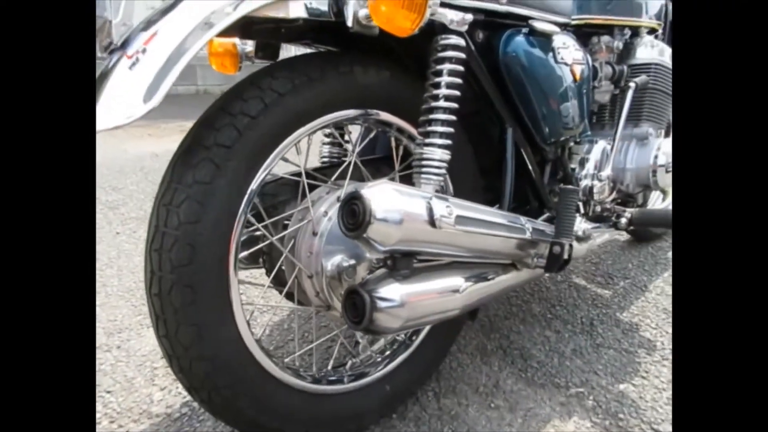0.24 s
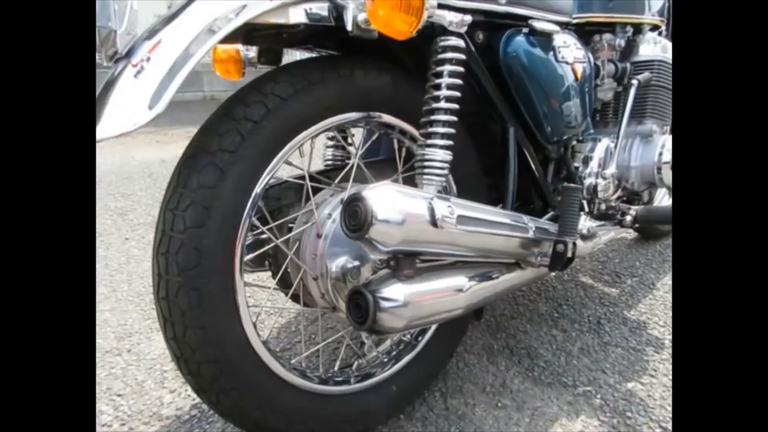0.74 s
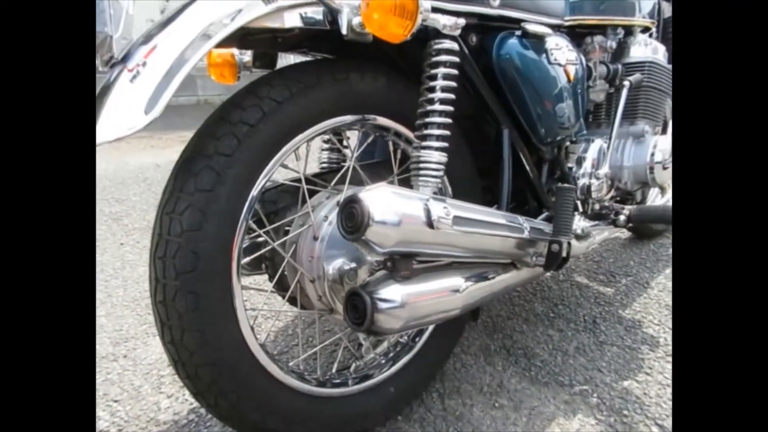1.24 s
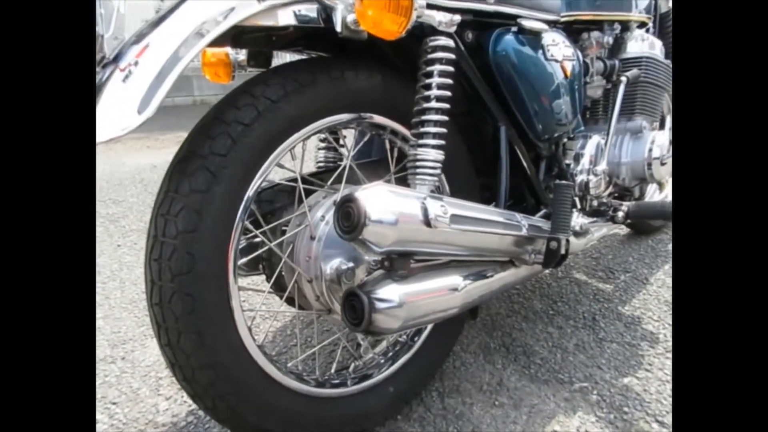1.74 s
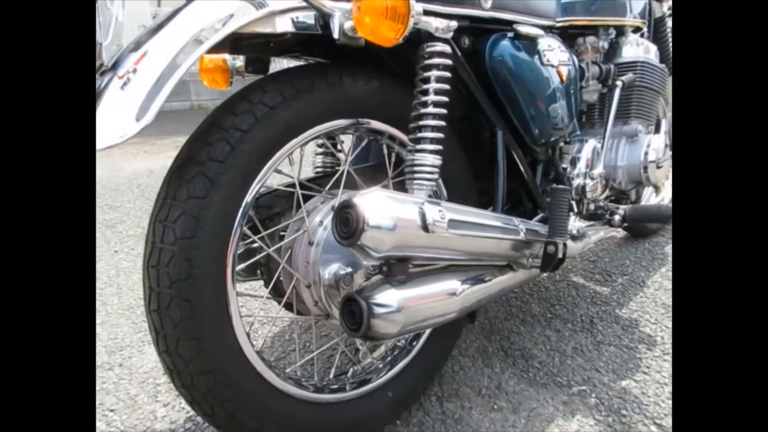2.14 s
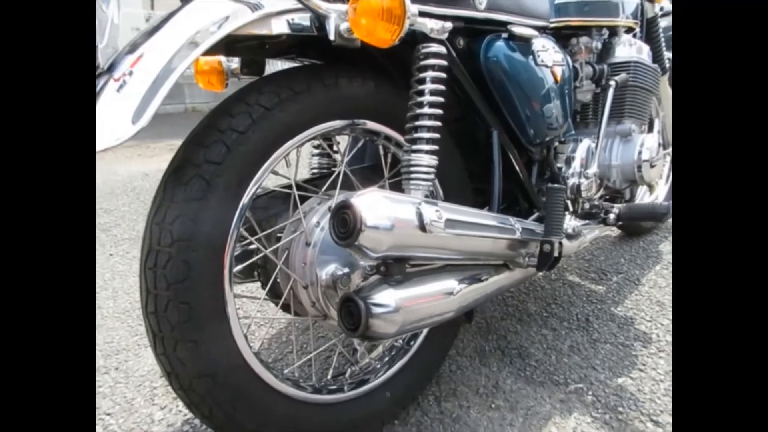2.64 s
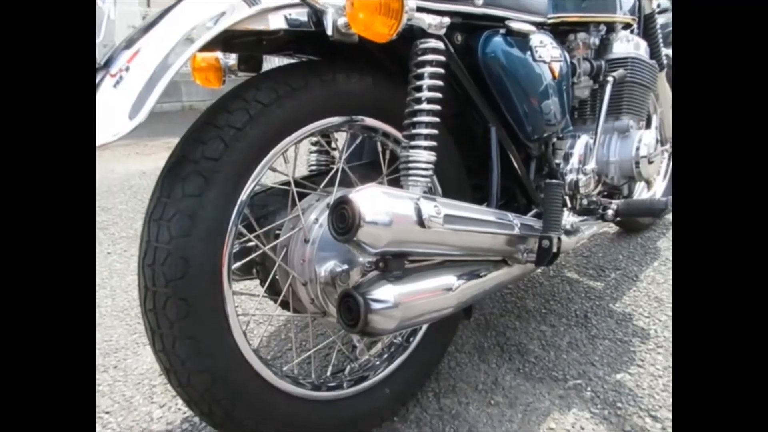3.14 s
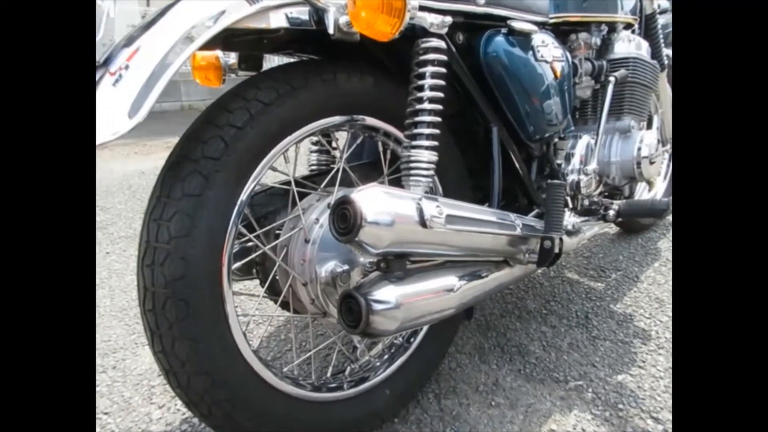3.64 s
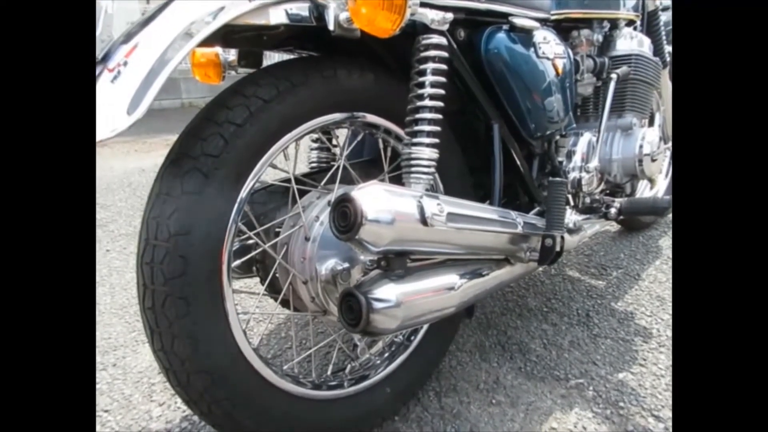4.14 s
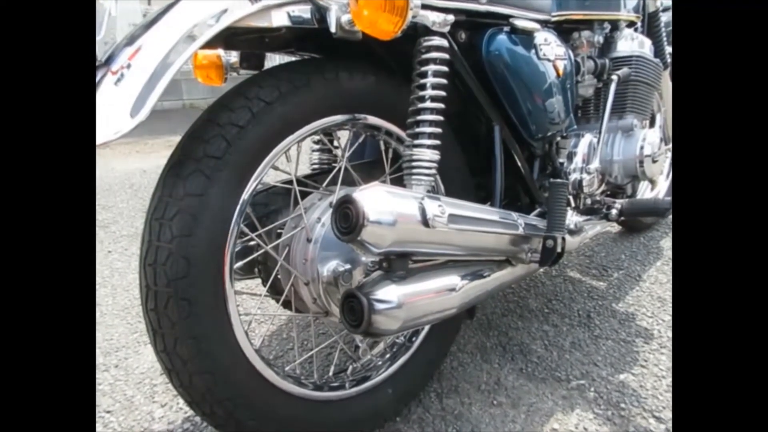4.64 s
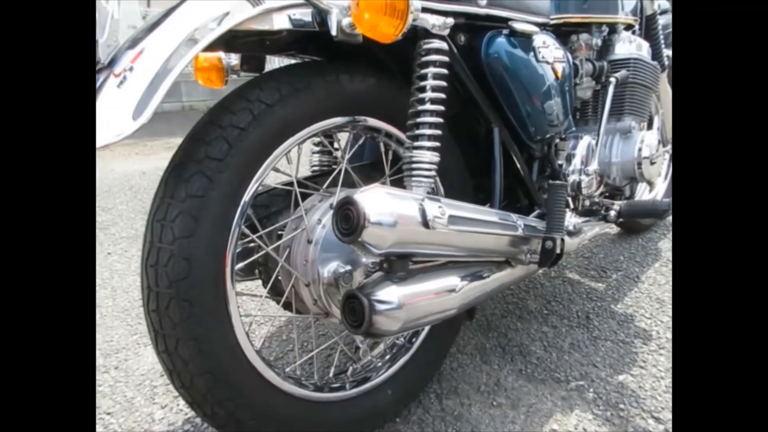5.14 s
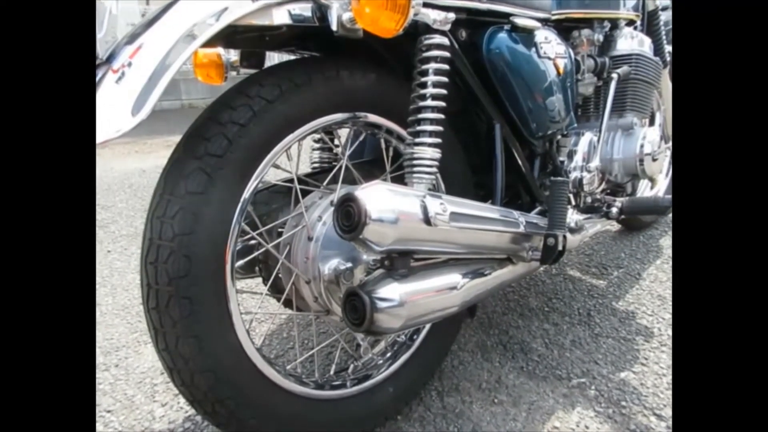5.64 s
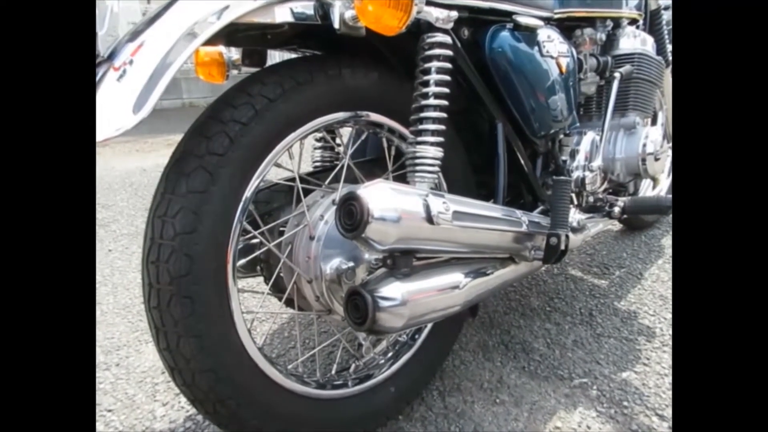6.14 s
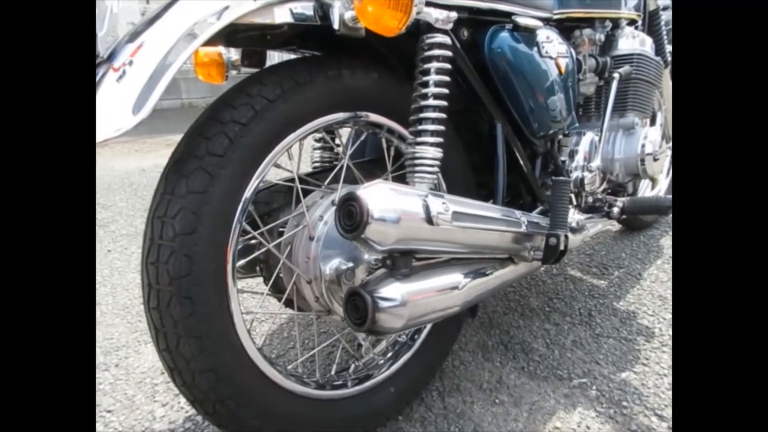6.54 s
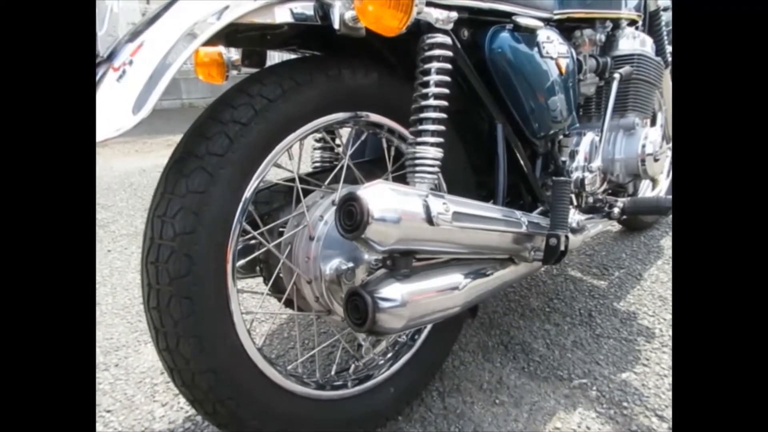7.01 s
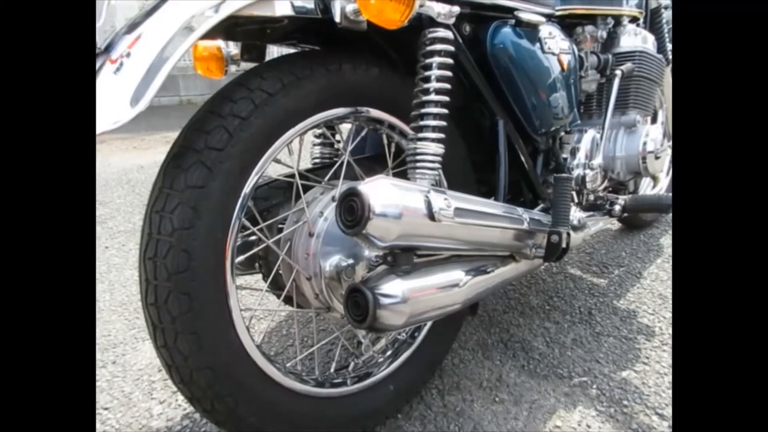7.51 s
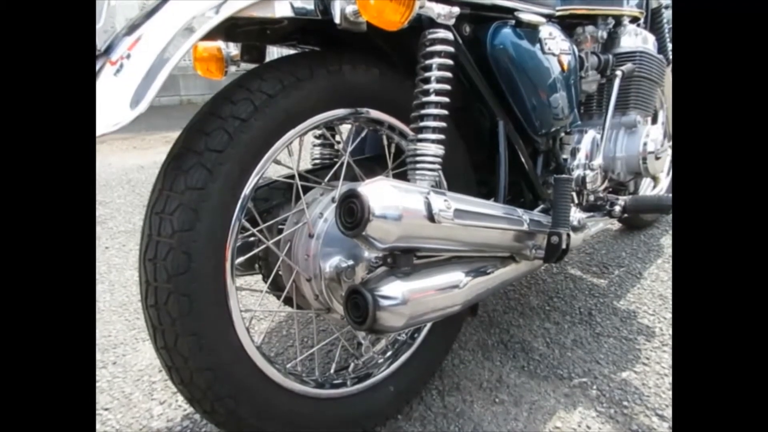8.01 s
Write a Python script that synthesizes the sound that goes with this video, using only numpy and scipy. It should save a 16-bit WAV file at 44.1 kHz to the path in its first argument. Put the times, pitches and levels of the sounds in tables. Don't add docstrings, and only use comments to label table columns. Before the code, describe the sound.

A four-cylinder motorcycle stands in a paved outdoor yard, heard close behind its pipes. It chuffs at a slow lumpy idle, each cycle with a tiny airy whistle. The throttle is blipped five times, a rough raspy roar rising quickly, then snapping shut into a smooth falling hum and uneven thumps. The first blip ends in a weak pop, the second in a loud crack. A sixth rise begins at the end.

```python
import sys
import numpy as np
from scipy import signal
from scipy.io import wavfile
from scipy.ndimage import uniform_filter1d

SR = 44100
rng = np.random.default_rng(int(sys.argv[2]) if len(sys.argv) > 2 else 0)


def file_out(sig):
    cols = np.atleast_2d(sig).T
    lim = np.clip(cols, -1, 1)
    pcm = np.round(lim * 32767).astype(np.int16)
    wavfile.write(sys.argv[1], SR, pcm)


def natural_amplitude(level_db):
    exponent = np.asarray(level_db, float) / 20
    return 10 ** exponent


N = 364707
TIME = np.arange(N) / SR

# opens t/s, shuts t/s, torque/(cycles/s^2), hiss level/dB, growl level/dB
BLIPS = [(0.696, 1.074, 213, -3.5, -22.5), (2.187, 2.626, 175, -3.5, -25.5), (3.742, 4.172, 206, 0, -33.5),
         (5.266, 5.682, 222, 1, -33), (6.768, 7.196, 215, 0.5, -35), (8.33, 8.7, 215, 0, -33)]
OPEN_S, EASE_S, EASE_SHARE, SHUT_S = 0.2, 0.12, 0.12, 0.036
SLACK_S, SLACK_SHARE = 0.3, 0.063

START_RATE, IDLE_RATE, TOP_RATE, DRAG, DRAG_KNEE = 17, 6.6, 70, 44, 7.0
SLOW_CYCLE_S = 0.054

# t/s, near whistle level/dB, second cylinder level/dB, last two level/dB
IDLE_CYCLES = [(0.0957, -24, -11.5, -16), (0.1798, -23, -24, -21), (0.2834, -20.5, -18, -25),
               (.411, -19, -26, -11.5), (0.5539, -16, -31, -18), (0.7142, -17.5, -22, -4),
               (1.7169, -22, -46, -41), (1.8254, -21, -30, -12.5), (1.9464, -22, -24, -26),
               (2.0899, -15.5, -40, -10.5), (2.235, -12, -32, -2.5), (3.2901, -22.5, -11.5, -31),
               (3.385, -19.5, -40, -21), (3.4987, -17.5, -15, -14), (3.6342, -20.5, -17, -8),
               (3.7684, -13.5, -10, -5.5), (4.8618, -19, -10.5, -24), (4.952, -18, -50, -21),
               (5.0598, -15, -33, -17), (5.186, -19.5, -12, -9), (5.3221, -12.5, -11, 1.5),
               (6.3304, -25, -14, -18), (6.414, -24.5, -17, -20.5), (6.5137, -20, -40, -23),
               (6.633, -22, -14, -20), (6.7667, -17.5, -40, -6), (7.8594, -25, -8.5, -28),
               (7.95, -19, -47, -37), (8.0604, -22.5, -19.5, -12), (8.183, -21, -14, -17)]
LULL_FIRST_CYCLES = [1, 27, 55, 86, 116, 146]
# t/s, cycle count, near whistle level/dB
ODD_PUFFS = [(0.0165, 0, -37.5), (0.8146, 7, -10), (0.9948, 11, -21), (1.0866, 14, -15.5),
             (1.3334, 21, -21.5), (1.549, 25, -21), (1.63, 26, -49), (2.332, 32, -9), (2.48, 35, -18.5),
             (2.6439, 40, -10.5), (2.86, 47, -22), (3.025, 51, -23), (3.139, 53, -36), (3.8646, 60, -7.5),
             (4.069, 65, -14), (4.1712, 69, -14), (4.4013, 77, -20), (4.715, 84, -22), (4.783, 85, -44),
             (5.413, 91, -11.5), (5.5436, 94, -16.5), (5.682, 99, -20), (6.0132, 110, -21.5),
             (6.0989, 112, -18.5), (6.2589, 115, -22), (6.88, 121, -10.5), (7.0318, 124, -14),
             (7.1991, 130, -28), (7.4769, 139, -18.5), (7.6556, 143, -22)]

# f/Hz, width/Hz, level/dB
SILENCER_MODES = [
    (106.1, 11.3, 4.5),
    (69.6, 23, 1),
    (171, 100, -5),
]
# f/Hz, width/Hz, level/dB
PIPE_MODES = [(240.5, 37, -2), (340, 143, -3), (501, 178, 4.5), (688, 240, 0.5), (873, 466, 6.5),
              (1160, 410, -3)]
# f/Hz, width/Hz, level/dB
HEADER_MODES = [(329.3, 28, 0), (241.6, 20, -7), (503, 49, -3)]
CYLINDER_DB = [7.5, 11, -3.5, 5]
# level/dB, then lift at open throttle/dB
SLOWING_DB = [-12.5, -18, -22, -14.5]
CATCH_DB = [14.5, -15, 12, 13]
SLOWING_SCATTER_DB = 3.0
THUMP_DB, THUMP_FOLLOWS, THIRD_DB = -10, 0.25, -2.5

# rate/(cycles/s), level/dB
BOOM_BY_RATE = [(8, -27.5), (17, -26), (22, -13), (24.5, -10), (28, -9.5), (32, -15.5), (38, -18.5)]
BOOM_OPEN_DB, BOOM_OPEN_RATE = 27, 22.8
LOAD_CUT_HZ, LOAD_LIFT_DB = 92, 2.5
# multiple of cycle rate, overrun level/dB, load level/dB
ORDERS = [(2, -42, 2.5), (3, -2.5, -2), (4, 9, 4), (5, -4, -2), (6, -18.5, -22), (7, -14, -24),
          (8, -17, -12), (12, -23.5, -9.5)]

# shut level at rest/dB, slope/(dB per cycle/s), open level/dB, its slope/(dB per cycle/s),
# share of a twist's hiss, lag power
FLOW = [
    (-45, 0.3955, -20, 0.27, 0.24, 0.61),
    (-50.5, 0.496, -27.5, 0.04, 0.38, 0.53),
    (-56, 0.3219, -32.5, 0, 2, 0.53),
]
# f/Hz, level/(dB per Hz)
JET_SPECTRUM = [(820, -41), (1400, -6), (2050, -3.5), (2470, -1.5), (3220, -9.5), (3660, -15.5),
                (4090, -12), (4850, -10.5), (5650, -27), (6000, -23), (7800, -53), (13200, -120)]
TOP_SPECTRUM = [(2120, -35), (3600, -13), (4290, -16.5), (4980, -8), (5640, 15.5), (6160, -16),
                (7380, -14.5), (14200, -20.5), (16000, -19)]
BANG_SPECTRUM = [(180, -30), (300, 2.5), (1780, -9), (2610, -6), (4520, -5), (7570, -14), (16000, -34)]
# f/Hz, correlation
LIKENESS = [(300, 0.35), (1000, 1), (2500, 0.99), (4500, 0.79), (9000, 0.46), (14000, 0.061)]
# t/s, level/dB, length/s
BACKFIRES = [
    (1.074, -26, 0.042),
    (2.637, -14.5, 0.03),
]

OVERTONES_DB = [4.5, -4, -69, -20.5]
WHISTLE_SHUT_DB, WHISTLE_OPEN_DB, WHISTLE_SCATTER_DB = -24.5, -15, 2
WHISTLE_STARVED_DB, STARVED_RATE = -8, 32.5
REBOUND_DB, REBOUND_S = -10.5, 0.009
KNOCK_FOLLOWS = 0.41

# delay/s, left level/dB, right level/dB
ECHOES = [
    (.0062, -26.5, -38),
    (0.0101, -104, -19.5),
]
# t/s, gain/dB
RECORDER_GAIN = [(0, -5.5), (.6, -7), (.8, -3), (2.665, -2), (2.69, -11.5), (3.5, -10), (3.8, -9),
                 (4.0, -4)]


def at_hz(points, hz):
    table_hz, value = np.transpose(points)
    return np.interp(np.log(hz), np.log(table_hz), value)


def band_filter(x, order, hz, kind):
    return signal.sosfilt(signal.butter(order, hz, kind, fs=SR, output="sos"), x)


def wander(step_s, count):
    return np.interp(TIME, np.arange(0, 9, step_s), rng.standard_normal(count))


def resonate(x, modes):
    out = 0
    for hz, width_hz, db in modes:
        r, w = np.exp(-np.pi * width_hz / SR), 2 * np.pi * hz / SR
        out = out + signal.lfilter([0, natural_amplitude(db) * np.sin(w)], [1, -2 * r * np.cos(w), r * r], x + 1e-18)
    return out


def clicks(times, sizes):
    at = np.round(np.asarray(times) * SR).astype(int)
    inside = (at >= 0) & (at < N)
    return np.bincount(at[inside], np.asarray(sizes)[inside], N)


def soften(x, hz):
    r = np.exp(-2 * np.pi * hz / SR)
    return signal.lfilter([(1 - r) ** 2], [1, -2 * r, r * r], x + 1e-18)


def local_rms(x, span_s):
    size = int(span_s * SR)
    return np.sqrt(uniform_filter1d(uniform_filter1d(x ** 2, size), size) + 1e-14)


def throttle(t):
    opens, shuts = np.array(BLIPS)[:, :2].T[:, :, None]
    ease = 1 - EASE_SHARE * np.clip((t - shuts) / EASE_S + 1, 0, 1)
    return np.clip((t - opens) / OPEN_S, 0, 1) * ease * np.clip(1 - (t - shuts) / SHUT_S, 0, 1)


def slack():
    since_open_s = TIME - np.array(BLIPS)[:, :1]
    creep = np.clip(since_open_s / SLACK_S + 1, 0, 1) * np.clip(1 - since_open_s / OPEN_S, 0, 1)
    return SLACK_SHARE * creep.sum(axis=0)


def known_puffs():
    s = np.array(IDLE_CYCLES)[:, 0]
    lull = np.cumsum(np.diff(s, prepend=0) > 0.4)
    cycles = np.array(LULL_FIRST_CYCLES)[lull] + np.arange(len(s)) - np.searchsorted(lull, lull)
    rows = np.r_[np.c_[s, cycles, np.array(IDLE_CYCLES)[:, 1]], ODD_PUFFS]
    rows[:, 1] = rows[:, 1].round()
    return rows[np.argsort(rows[:, 0])], cycles


def crank():
    step_s = 0.002
    t = np.arange(0, 8.6, step_s)
    rate, rates = START_RATE, []
    for torque in np.array(BLIPS)[:, 2] @ throttle(t):
        drag = DRAG * np.tanh((rate - IDLE_RATE) / DRAG_KNEE)
        rate += step_s * (torque * (1 - rate / TOP_RATE) - drag)
        rates.append(rate)
    turns = np.cumsum(rates) * step_s
    s, cycle, _ = known_puffs()[0].T
    at = np.interp(s, t, turns)
    pinned = np.interp(np.arange(cycle[-1] + 2), np.r_[cycle, cycle[-1] + 1], np.r_[at, at[-1] + 1])
    return np.interp(pinned, turns, t)


def firings(marks):
    return np.interp(np.arange(4 * len(marks) - 4) / 4, np.arange(len(marks)), marks)


def levels(marks):
    rate = np.interp(TIME, (marks[1:] + marks[:-1]) / 2, 1 / np.diff(marks))
    twists = throttle(TIME)
    opening, hiss_db = twists.sum(axis=0), np.array(BLIPS)[:, 3] @ twists
    labour_db = BOOM_OPEN_DB * opening * np.clip(1 - rate / BOOM_OPEN_RATE, 0, 1)
    boom_db = np.interp(rate, *np.transpose(BOOM_BY_RATE)) + labour_db
    opening = np.clip(opening + slack(), 0, 1)
    flows = []
    for rest_db, slope, open_db, climb, share, lag in FLOW:
        flowing = opening ** lag
        shut_part_db = (rest_db + slope * rate) * (1 - flowing)
        open_part_db = (open_db + climb * (rate - 30)) * flowing
        flows.append(shut_part_db + open_part_db + share * hiss_db)
    return boom_db, *flows, hiss_db


def yard(x):
    dull = band_filter(x, 1, [250, 9000], "band")
    out = np.tile(x, (2, 1))
    for s, left_db, right_db in ECHOES:
        for side, db in enumerate((left_db, right_db)):
            lag = round((s + 0.0004 * side) * SR)
            out[side, lag:] += natural_amplitude(db) * dull[:-lag]
    return out


def hiss(spectrum, low_hz, octaves, flicker_db):
    out, white = 0, rng.standard_normal((2, 2, N))
    edges = np.minimum(low_hz * 2 ** np.arange(0, octaves + 0.01, 1 / 3), 0.45 * SR)
    for k, (low, high) in enumerate(zip(edges, edges[1:])):
        mid, side = band_filter(white[k % 2], 2, [low, high], "band")
        centre_hz = np.sqrt(low * high)
        alike = np.clip(at_hz(LIKENESS, centre_hz), 0, 1)
        gain = natural_amplitude(at_hz(spectrum, centre_hz) + flicker_db * wander(0.012, 750))
        out = out + gain * (np.sqrt(1 + alike) * mid + np.sqrt(1 - alike) * side * [[1], [-1]])
    return out / np.sqrt(np.mean(out ** 2))


def gusts(times, sizes, decay_hz, depth):
    flow = soften(clicks(times, sizes), decay_hz)
    flow = 1 + depth * flow / local_rms(flow, 0.23)
    return flow / local_rms(flow, 0.13)


def jet_noise(times, sizes, jet_db, top_db):
    jet = natural_amplitude(jet_db + 2.0) * hiss(JET_SPECTRUM, 1418, 2, flicker_db=3.5)
    top = natural_amplitude(top_db + 1.0) * hiss(TOP_SPECTRUM, 3409, 7 / 3, flicker_db=3.0)
    return (jet + top) * gusts(times, sizes, 40, depth=0.45)


def growl(times):
    rung = resonate(soften(clicks(times, natural_amplitude(rng.normal(0, 4.1, len(times)))), 800), HEADER_MODES)
    rung = band_filter(rung, 2, 200, "high")
    return natural_amplitude(np.array(BLIPS)[:, 4]) @ throttle(TIME) ** 2.3 * rung / local_rms(rung, 0.16)


def rasp(times, sizes, load, rasp_db):
    ragged = times + 0.0007 * rng.standard_normal(len(times))
    uneven = sizes * natural_amplitude(rng.normal(0, 2.9, len(times)))
    fronts = resonate(soften(clicks(ragged, uneven), 1130), PIPE_MODES)
    swirl = resonate(rng.standard_normal(N) * gusts(times, sizes, 27, depth=0.51), PIPE_MODES)
    mix = (0.15 + 0.85 * load) * fronts / local_rms(fronts, 0.06) + 0.75 * swirl / local_rms(swirl, 0.06)
    mix = band_filter(mix, 2, 200, "high")
    return natural_amplitude(rasp_db) * mix / local_rms(mix, 0.11)


def backfires():
    out = 0
    for start_s, db, length_s in BACKFIRES:
        age_s = TIME - start_s
        cutoff = 1 + np.exp(np.clip((age_s - length_s) / 0.0028, -50, 50))
        out = out + natural_amplitude(db) * (TIME > start_s) / cutoff * np.exp(-18 * np.clip(age_s, 0, 1))
    return out


def bursts(s, puff_db):
    uneven_db = rng.normal(0, 2.2, len(s))
    spit = soften(clicks(s - 0.003, natural_amplitude(puff_db + uneven_db)), 98) * natural_amplitude(34.0)
    knock_db = KNOCK_FOLLOWS * (puff_db + 16.5) - 19
    knock = resonate(soften(clicks(s - 0.002, natural_amplitude(knock_db)), 670), [(361.7, 51, -4.5)])
    roar = hiss(BANG_SPECTRUM, 312, 5.7, flicker_db=2.0)
    bright = signal.lfilter([1, -0.8], [1], roar)
    return spit * bright + backfires() * roar + knock


def whistle_levels(marks, hiss_db):
    s, rate = marks[:-1], 1 / np.diff(marks)
    opening = throttle(s).sum(axis=0)
    starved = (1 - opening) * np.clip((rate - STARVED_RATE) / 2 + 1, 0, 1)
    db = WHISTLE_SHUT_DB + (WHISTLE_OPEN_DB - WHISTLE_SHUT_DB) * opening
    db += 3.1 * np.interp(s, TIME, hiss_db) + WHISTLE_STARVED_DB * starved
    db += WHISTLE_SCATTER_DB * rng.standard_normal(len(s))
    _, cycle, known_db = known_puffs()[0].T
    db[cycle.astype(int)] = known_db
    return db


def whistles(times, levels_db, pitches_hz, rise_s, fall_s, sag):
    out, t = np.zeros(N + 2000), np.arange(1200) / SR
    age = t - 3 * rise_s
    shape = np.where(age < 0, np.exp(-(age / rise_s) ** 2), 1 / np.cosh(age / fall_s))
    chance = rng.standard_normal((len(times), 18))
    for s, db, hz, c in zip(times, levels_db, pitches_hz, chance):
        waver = np.interp(t, np.arange(12) * 0.0017, c[6:])
        phase = 2 * np.pi * np.cumsum(hz * (1 - sag * age + 0.03 * waver)) / SR + c[0]
        tone = 0
        for k, partial_db in enumerate(OVERTONES_DB):
            richer_db = (1.1 * c[k + 1] + 0.51 * (db + 8.0)) * (k > 0)
            tone = tone + natural_amplitude(partial_db + richer_db) * shape * np.cos((k + 1) * phase)
        at = max(round((s - 3 * rise_s) * SR), 0)
        out[at:at + 1200] += natural_amplitude(db) * tone
    return out[:N]


def near_whistle(s, puff_db):
    pitches_hz = 2445 + 70 * rng.standard_normal(len(s))
    return whistles(s, puff_db, pitches_hz, rise_s=0.0012, fall_s=0.0012, sag=7.5)


def far_whistles(times, s, puff_db, jet_db):
    others = np.delete(times, np.s_[::4])
    others_db = np.interp(others, TIME, jet_db) - 27.5 + 6 * rng.standard_normal(len(others))
    rebound_db = puff_db + REBOUND_DB + 3 * rng.standard_normal(len(s))
    rebound = s + REBOUND_S * rng.uniform(0.8, 1.3, len(s))
    starts, starts_db = np.r_[others, rebound], np.r_[others_db, rebound_db]
    pitches_hz = 2450 + 190 * rng.standard_normal(len(starts))
    return whistles(starts, starts_db, pitches_hz, rise_s=0.0011, fall_s=0.00073, sag=22)


def lumps(marks):
    opening = throttle(marks[:-1]).sum(axis=0)[:, None]
    scatter_db = SLOWING_SCATTER_DB * rng.standard_normal((len(marks) - 1, 4))
    db = SLOWING_DB + np.array(CATCH_DB) * opening + scatter_db
    _, near_db, second_db, last_db = np.transpose(IDLE_CYCLES)
    thump_db = THUMP_DB + THUMP_FOLLOWS * (near_db + 20)
    db[known_puffs()[1]] = np.c_[thump_db, second_db, last_db + THIRD_DB, last_db]
    return db.ravel(), np.repeat(np.diff(marks) > SLOW_CYCLE_S, 4)


def silencer(times, sizes, push_hz):
    rung = resonate(soften(clicks(times, sizes), push_hz), SILENCER_MODES)
    return band_filter(rung, 3, [62, 260], "band")


def drone(times, load, boom_db, waver_db):
    turns = np.interp(TIME, times, np.arange(len(times)) / 4)
    out = 0
    for order, overrun_db, load_db in ORDERS:
        waver = wander(0.03, 300)
        level = natural_amplitude(overrun_db + (load_db - overrun_db + waver_db * waver) * load + 1.4 * waver)
        out = out + level * np.cos(2 * np.pi * order * turns + 1.3 * order ** 2)
    out = band_filter(out, 2, 98, "high")
    return natural_amplitude(boom_db) * out / local_rms(out, 0.051)


def boom(times, lumpy_db, slow, load, boom_db, scatter_db, push_hz):
    rough = np.interp(times, TIME, load)
    chance = rng.standard_normal((len(times), 2))
    sizes = natural_amplitude(np.resize(CYLINDER_DB, len(times)) + (0.5 + scatter_db * rough) * chance[:, 0])
    sizes[::4] *= 1 + 0.89 * rough[::4]
    start = times - 0.0035 + 0.0019 * rough * chance[:, 1]
    unscaled_rms = local_rms(silencer(start, sizes, push_hz), 0.023)
    sizes *= np.interp(times, TIME, natural_amplitude(boom_db) / unscaled_rms)
    sizes[slow] = natural_amplitude(lumpy_db[slow] - 6.0)
    fast = np.clip((0.25 / np.gradient(times) - 19.5 - 6 * rough) / 5, 0, 1)
    ringing = silencer(start, sizes * (1 - fast * (0.88 - 0.2 * rough)), push_hz)
    merged = np.sqrt(np.interp(TIME, times, fast)) * drone(times, load, boom_db - 1.2, waver_db=1.8)
    return ringing + merged, sizes


def thin_under_load(low):
    thin = band_filter(low, 2, LOAD_CUT_HZ, "high")
    opening = throttle(TIME).sum(axis=0)
    return (1 - opening) * low + opening * natural_amplitude(LOAD_LIFT_DB) * thin


def scene():
    marks = crank()
    times = firings(marks)
    boom_db, rasp_db, jet_db, top_db, hiss_db = levels(marks)
    puffs = marks[:-1], whistle_levels(marks, hiss_db)
    load = np.clip((rasp_db - boom_db + 14) / 6, 0, 1)
    low, sizes = boom(times, *lumps(marks), load, boom_db, scatter_db=-1.5, push_hz=176)
    low = thin_under_load(low)
    tilt = 1 + 0.018 * np.array([[1], [-1]]) * wander(0.02, 450)
    pipes = rasp(times, sizes, load, rasp_db) + growl(times)
    pipes = pipes + near_whistle(*puffs) + far_whistles(times, *puffs, jet_db)
    return tilt * low + yard(pipes) + jet_noise(times, sizes, jet_db, top_db) + bursts(*puffs)


def low_pass(x):
    return signal.sosfilt(signal.butter(12, 16330, fs=SR, output="sos"), x)


def record(dry):
    gain = natural_amplitude(np.interp(TIME, *np.transpose(RECORDER_GAIN)))
    rounded = 1.113 * np.tanh(gain * dry / 0.81)
    top_cut = signal.cheby2(10, 60, 16550, fs=SR, output="sos")
    return low_pass(signal.sosfilt(top_cut, rounded))


dry = scene()
out = record(dry)
file_out(out)
```